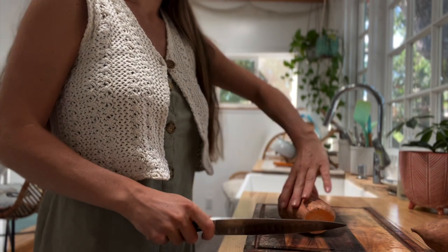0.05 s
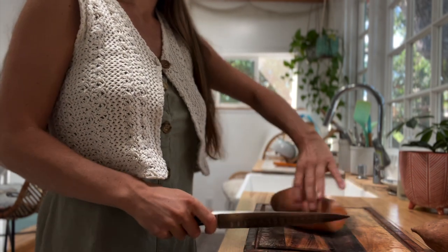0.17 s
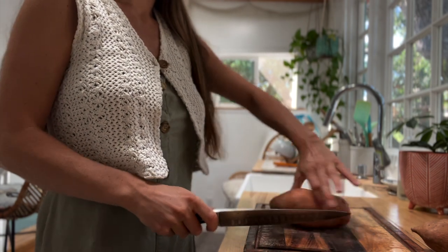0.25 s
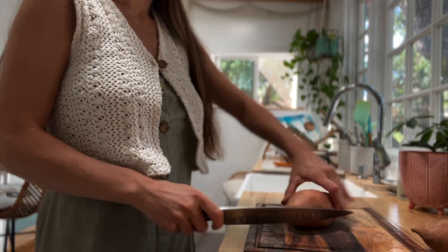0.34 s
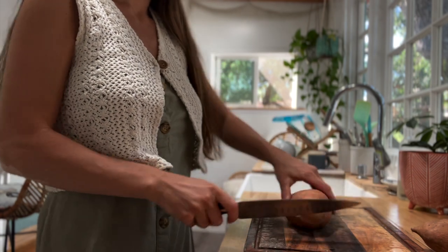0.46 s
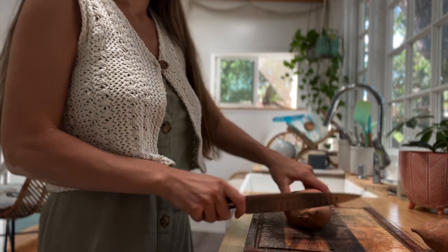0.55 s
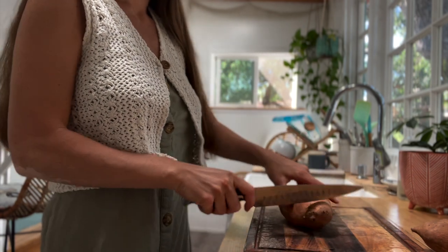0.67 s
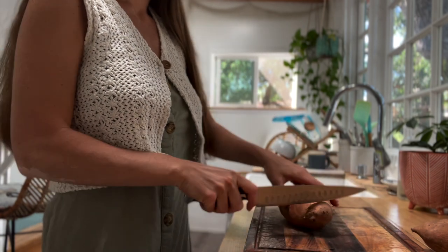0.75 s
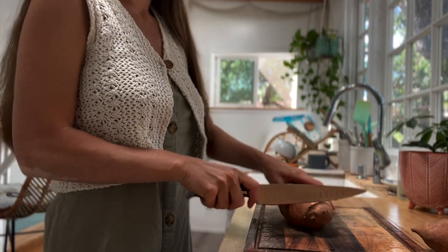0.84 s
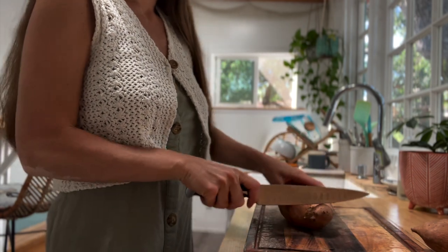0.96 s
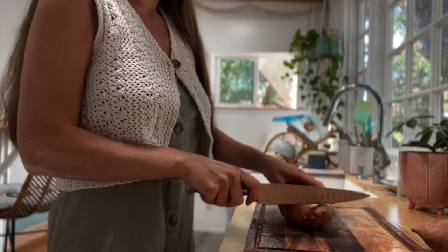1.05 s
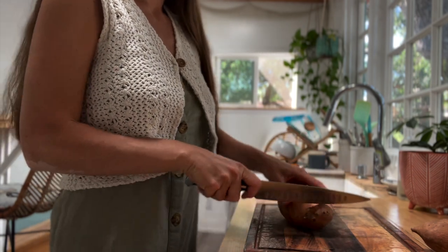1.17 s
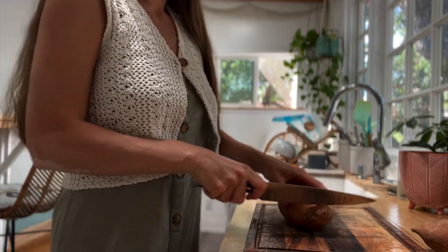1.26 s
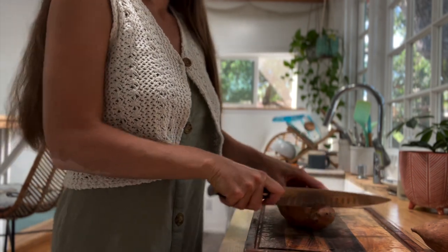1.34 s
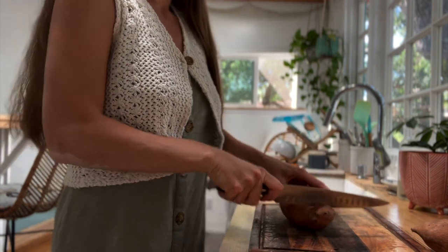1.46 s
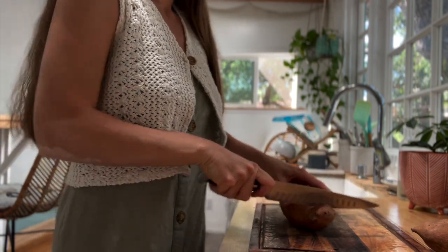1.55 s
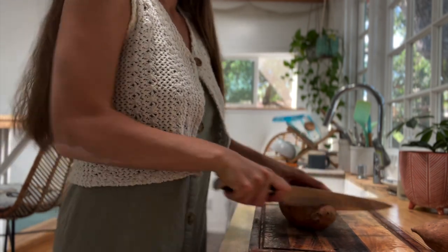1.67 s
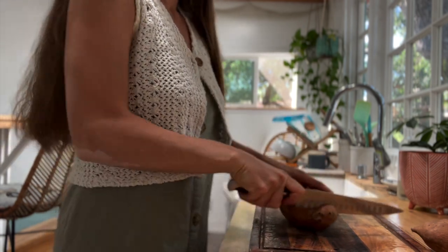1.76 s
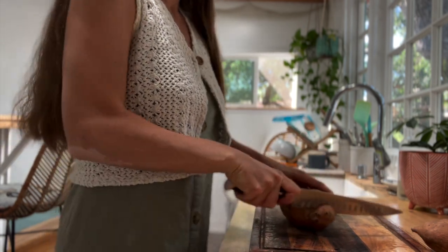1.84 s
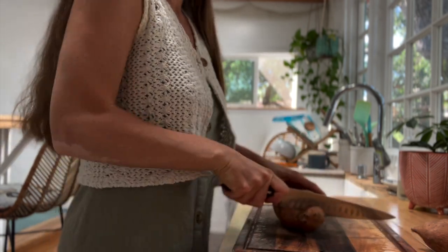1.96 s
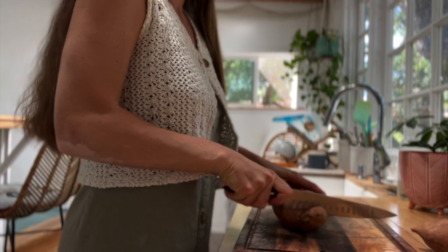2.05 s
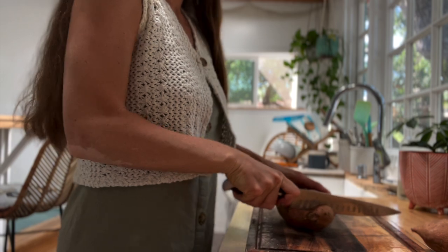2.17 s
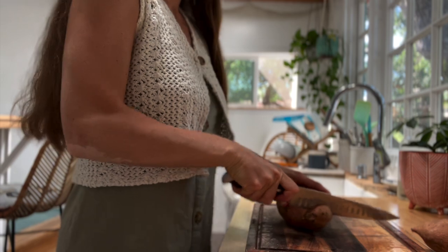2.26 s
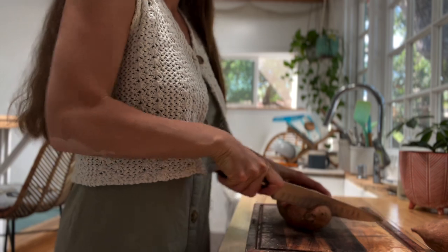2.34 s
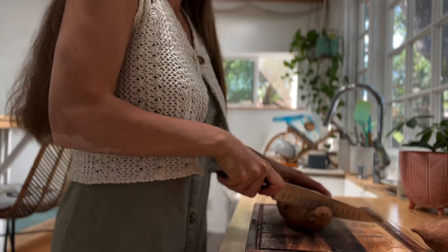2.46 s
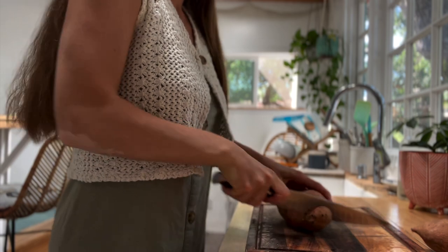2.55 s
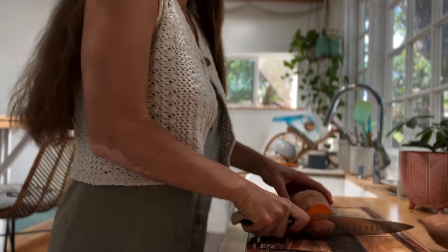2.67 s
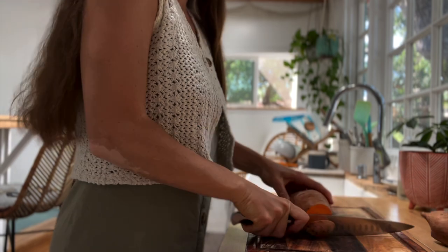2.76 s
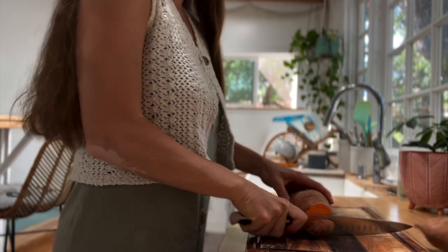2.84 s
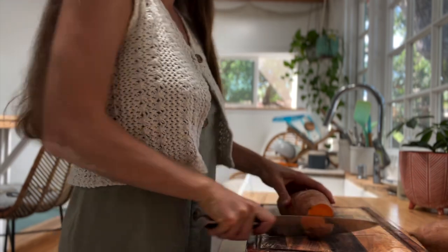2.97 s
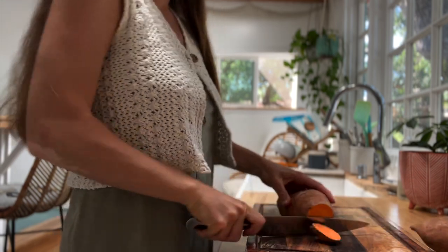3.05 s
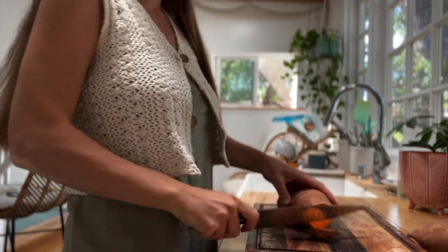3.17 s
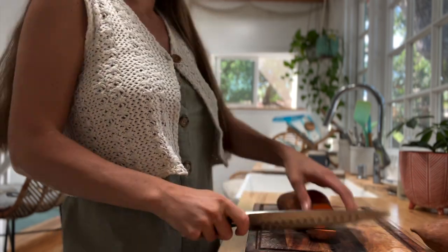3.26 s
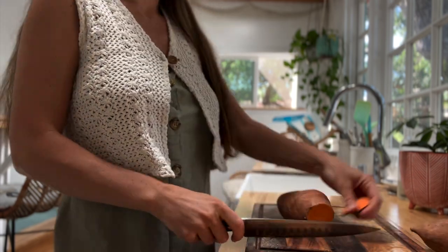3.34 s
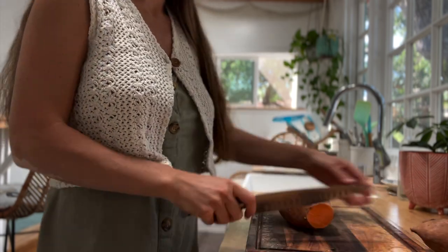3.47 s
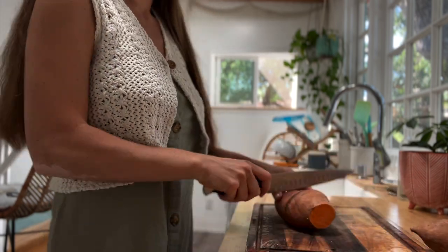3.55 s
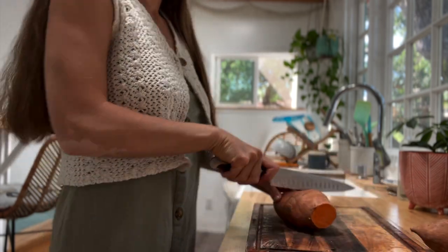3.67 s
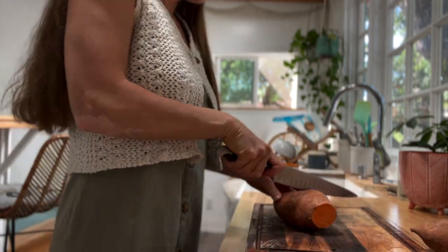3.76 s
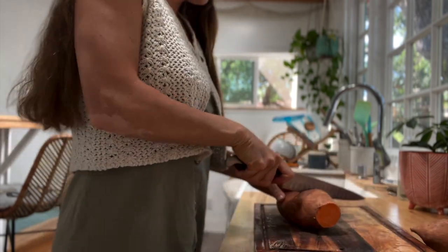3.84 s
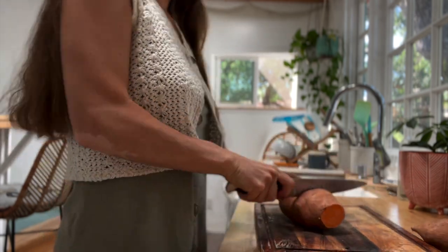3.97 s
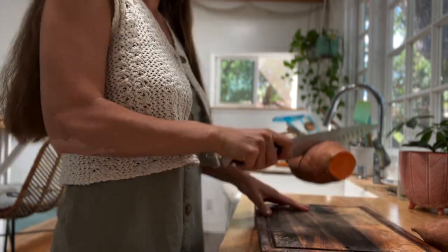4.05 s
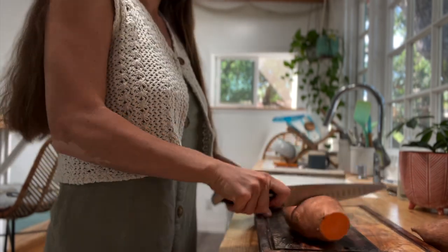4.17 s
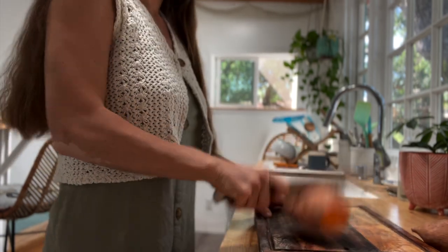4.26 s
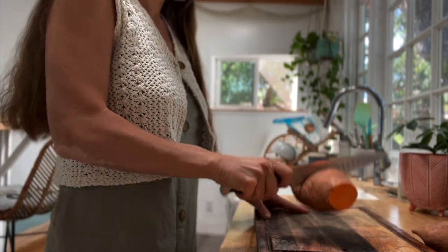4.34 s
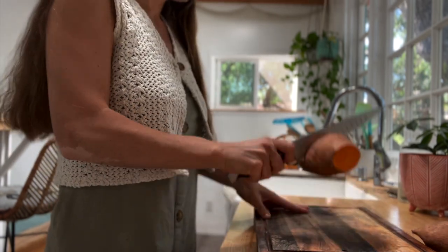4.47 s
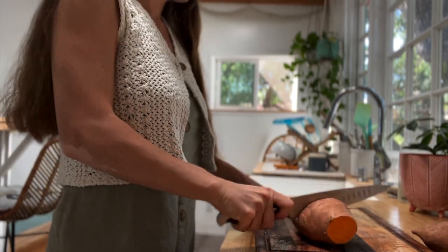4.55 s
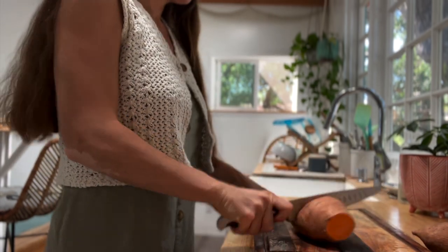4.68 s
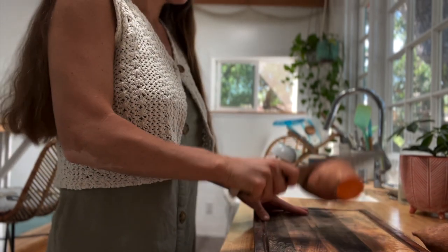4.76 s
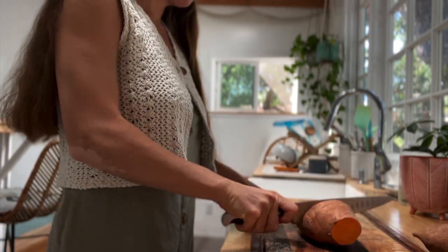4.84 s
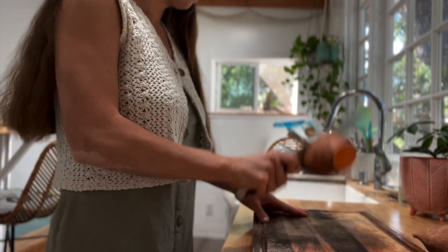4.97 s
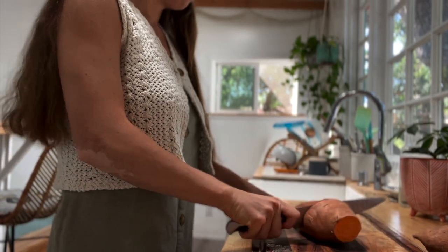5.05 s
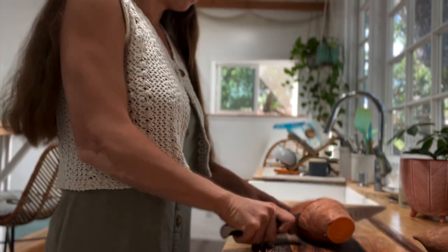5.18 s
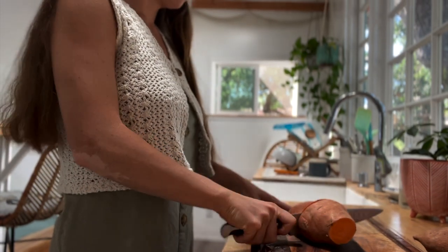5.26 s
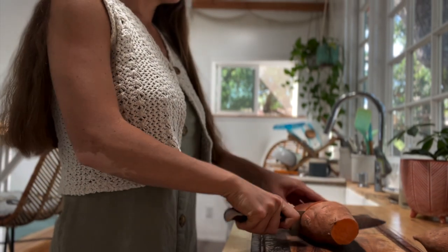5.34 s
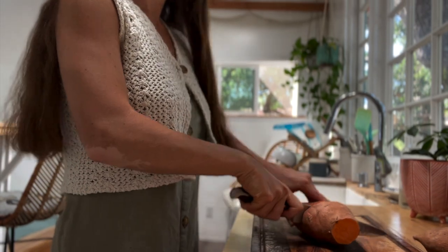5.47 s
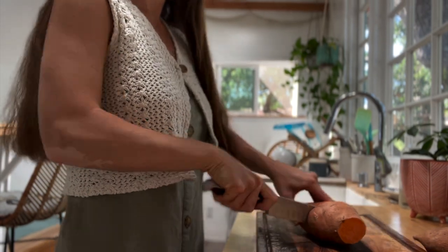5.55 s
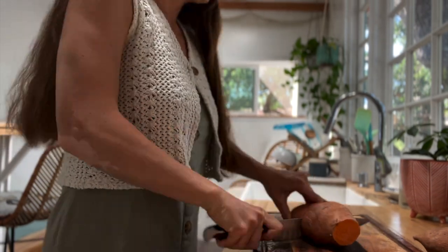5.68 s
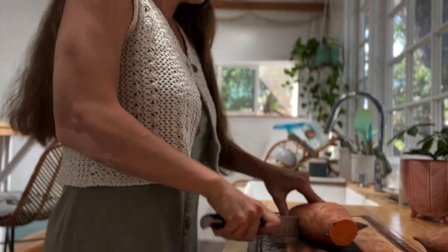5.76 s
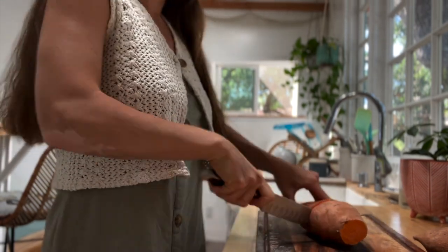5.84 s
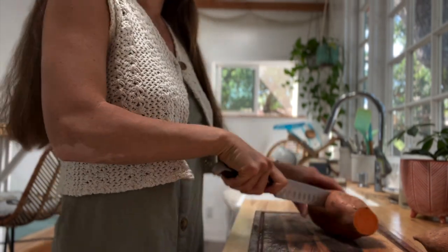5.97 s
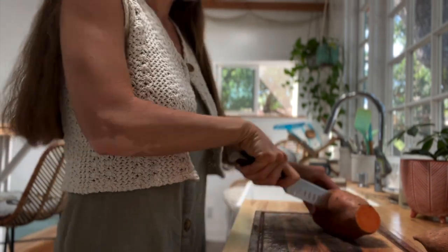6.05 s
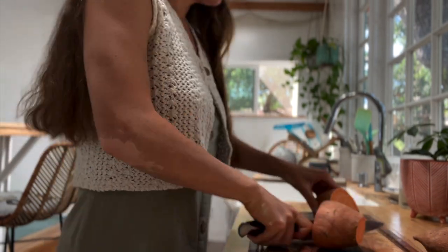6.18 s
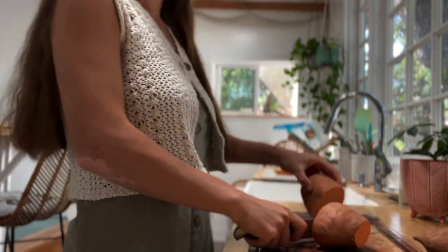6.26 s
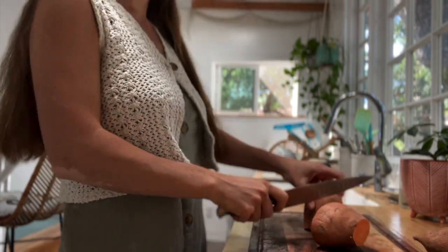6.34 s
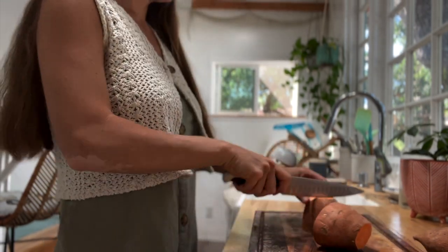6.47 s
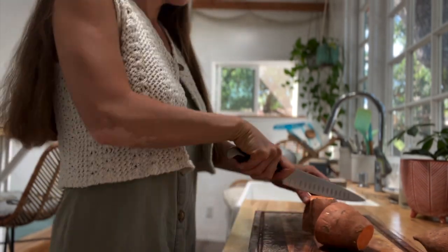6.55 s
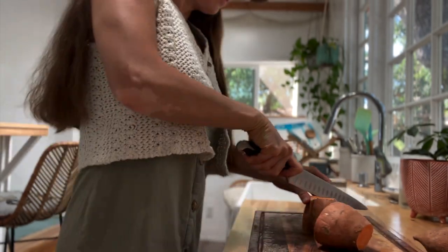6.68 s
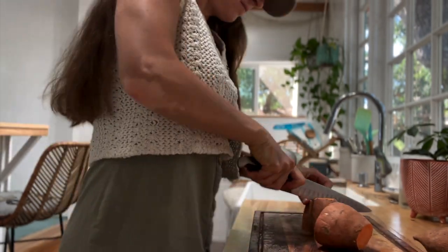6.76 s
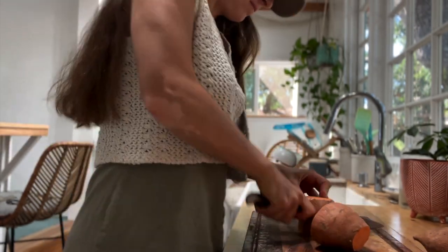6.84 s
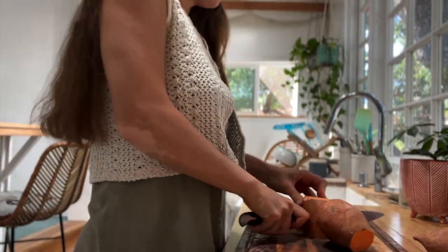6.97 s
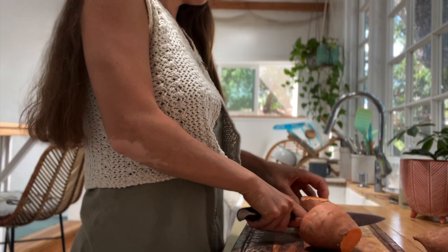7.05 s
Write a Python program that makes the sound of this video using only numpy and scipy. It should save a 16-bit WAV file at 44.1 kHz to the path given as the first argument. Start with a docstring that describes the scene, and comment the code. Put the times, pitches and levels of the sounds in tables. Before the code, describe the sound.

A kitchen knife saws through raw sweet potato with wet rasps and snaps, knocking irregularly on a wooden board.

```python
"""In a small kitchen, a knife saws into a raw sweet potato on a wooden board.
Wet flesh hisses as it tears, the blade rasps and snaps on skin and wood, and once the steel sings.
The knife breaks through and knocks the board, and the stuck root is banged down: board and counter
ring low and the room answers. A fridge hums behind it. Now and then the ringing breaks off abruptly."""
import sys
import numpy as np
from scipy import signal
from scipy.fft import rfft, irfft, next_fast_len
from scipy.io import wavfile
from scipy.ndimage import uniform_filter1d, map_coordinates

SR = 44100
rng = np.random.default_rng(int(sys.argv[2]) if len(sys.argv) > 2 else 0)


def wav_record(signal):
    """Record a signal, one row per channel, as 16-bit PCM in the file named by sys.argv[1]."""
    frames = np.transpose(np.atleast_2d(signal))
    bounded = np.clip(frames, -1, 1)
    # unit amplitude maps onto the largest positive 16-bit level
    quanta = np.round(bounded * 32767).astype(np.int16)
    wavfile.write(sys.argv[1], SR, quanta)


N = 313551

# Levels in the tables are relative. A ring time is how long a sound takes to fade by 60 dB.
# How alike the two ears hear a noise. Each row: frequency in Hz, likeness (1 is the same).
EAR_LIKENESS = [(60, 0.97), (300, 0.71), (700, 0.85), (3000, 0.39), (8000, .9)]
# How far the two sides are out of step. Each row: frequency in Hz, phase in radians.
EAR_PHASE = [(100, 0.14), (400, 0.52), (800, 1.5), (3000, 1.54), (12000, 1.7)]
# Moments when the ringing breaks off. Each row: time in seconds, drop in dB.
CUTOFFS = [(3.253, -40), (4.297, -20.5), (4.656, -4), (4.82, -7.5), (5.132, -30), (5.319, -33),
           (5.768, -4.5), (6.245, -15.5), (6.99, -24.5), (7.082, -18)]
# The background over time. Each row: time in seconds, then fridge hum, murmur and air, all in dB.
ROOM_LEVELS = [(0, -69.5, -73, -74.5), (.56, -66, -63.5, -73), (1.05, -68.5, -72.5, -76),
               (1.4, -70, -67, -74), (2.0, -71, -60, -70.5), (2.42, -70.5, -71, -78),
               (2.8, -68, -64, -70.5), (3.24, -64, -64.5, -75.5), (3.265, -85, -74, -81),
               (3.32, -68, -54, -79), (3.45, -69, -50, -72), (3.7, -69, -62, -77), (4.1, -75, -73, -76),
               (4.29, -77, -73, -77.5), (4.42, -75, -59, -59.5), (5.05, -79, -69, -86),
               (5.38, -81.5, -72.5, -79.5), (5.49, -86, -88.5, -87), (5.7, -88, -79.5, -75.5),
               (6.1, -88, -81, -88), (6.26, -79, -40.5, -64.5), (6.39, -80, -70.5, -77),
               (6.52, -76, -57.5, -73), (6.69, -73.5, -67, -67), (6.8, -75.5, -47, -61.5),
               (7.11, -69, -52.5, -63)]
# The low murmur of counter and room. Each row: frequency in Hz, level in dB.
MURMUR_SPECTRUM = [(40, -49), (80, -21), (125, 1), (160, -15.5), (215, 0), (260, -8), (390, -7),
                   (480, -14.5), (540, -8), (700, -32.5), (1500, -93.5)]
# The soft rush of air. Each row: frequency in Hz, level in dB.
AIR_SPECTRUM = [(380, -42), (650, -12.5), (929, -3), (1100, -10), (1630, -15), (4000, -30.5), (5200, -65.5),
                (8800, -120)]
# The tones of lightly brushed steel. Each row: pitch in Hz, level in dB.
STEEL_TONES = [(4129, -88), (4980, -70.5), (6266, -85), (7483, -69.5), (8753, -77), (10164, -98),
               (11709, -84), (13356, -83)]
# The hiss of wet flesh, also used for the room's faint rustle. Each row: frequency in Hz, level in dB.
HISS_SPECTRUM = [(600, -80), (2650, -36), (4500, -4), (5390, 0.5), (8370, -5.5), (10000, 0.5), (11800, -2),
                 (12500, -9.5), (15000, 0), (16000, 4.5)]
# The edge tearing flesh. Each row: peak time, swell and fade in seconds, level in dB.
SLICE_STROKES = [(.226, 0.11, 0.086, -51.5), (.36, .08, 0.54, -74.5), (1.23, .06, 0.11, -52.5),
                 (1.476, 0.045, 0.065, -68.5), (1.658, 0.051, 0.077, -41.5), (1.872, .03, .06, -69),
                 (2.26, 0.024, .08, -58), (2.495, .009, 0.16, -42), (2.535, .022, .08, -22),
                 (2.86, .04, .15, -50), (2.94, 0.1, 0.066, -44), (3.088, 0.011, 0.17, -64.5),
                 (3.188, .01, 0.1, -67), (3.31, 0.061, 0.041, -71), (3.716, .02, 0.1, -52),
                 (3.842, .055, 0.048, -40), (4.002, 0.037, 0.031, -57), (4.272, 0.023, .1, -58),
                 (4.555, .05, 0.082, -52), (4.7, .03, .15, -65.5), (5.065, 0.032, 0.1, -53),
                 (5.3, .021, .04, -42.5), (5.658, .015, .012, -70), (5.745, 0.045, .025, -47.5),
                 (6.09, 0.017, .1, -42), (6.118, 0.029, 0.14, -32), (6.195, .06, 0.06, -36.5),
                 (6.346, .006, 0.035, -56.5), (6.622, .015, 0.13, -67), (6.875, 0.028, 0.15, -36),
                 (6.92, .021, 0.076, -37.5)]
# Blade or root rubbing on skin and wood. Each row: peak time, swell and fade in seconds, level in dB,
# extra dB for the upper resonances.
RUB_STROKES = [(.226, 0.1, 0.085, -67.5, 3), (1.22, 0.026, 0.23, -66, -4), (1.66, 0.058, 0.1, -66, 8),
               (1.909, 0.1, 0.06, -55.5, -8), (2.074, 0.054, 0.094, -64.5, -6), (2.27, .06, 0.093, -74, -4),
               (2.5, 0.013, .3, -52, 6.5), (2.543, .012, 0.09, -18, -6.5), (2.69, 0.055, 0.15, -47, -3),
               (2.856, 0.023, 0.22, -41.5, -11), (2.96, 0.15, 0.053, -40.5, -10.5),
               (3.508, 0.0045, 0.043, -59.5, -8), (3.58, .01, 0.037, -64.5, -2.5),
               (3.716, 0.022, 0.17, -65, 0), (3.841, 0.047, 0.062, -46, -2),
               (4.002, 0.038, 0.044, -64.5, -5), (4.272, 0.036, .08, -36, -16.5),
               (4.33, 0.039, .3, -49, -15), (4.44, 0.16, .15, -48.5, -10.5),
               (4.557, 0.033, 0.073, -22.5, -8.5), (4.685, 0.017, 0.18, -36, -10.5),
               (4.88, 0.034, 0.34, -51.5, -8.5), (4.936, .012, 0.046, -45, -7.5),
               (5.087, 0.039, 0.027, -24.5, -1.5), (5.301, 0.028, 0.096, -29.5, -2.5),
               (5.748, 0.049, 0.043, -63.5, 4), (6.092, 0.013, 0.19, -61.5, 17.5),
               (6.128, 0.011, 0.093, -29.5, -7), (6.346, 0.0053, .03, -74, 1.5),
               (6.74, 0.0053, 0.14, -37, -23.5), (6.884, 0.036, 0.15, -41, -1),
               (6.916, 0.0058, 0.068, -17.5, -7.5), (7.069, 0.019, .022, -46, -33)]
# Where rubbed blade and root resonate. Each row: centre in Hz, width in Hz, level in dB.
RUB_RESONANCES = [(728, 310, -1.5), (980, 140, 0.5), (1496, 200, -7), (1813, 190, 3), (2133, 330, -1.5),
                  (2928, 640, 1.5), (3570, 280, 2), (3950, 630, -2.5), (5020, 1100, -9.5),
                  (6204, 2100, -16)]
# The edge snapping on skin or wood. Each row: start in seconds, level in dB, rough centre in Hz,
# ring time in seconds.
EDGE_SNAPS = [(2.494, -46, 1980, 0.027), (2.541, -1.5, 2030, 0.022), (2.564, -21.5, 2334, 0.03),
              (3.39, -59, 689, 0.037), (3.511, -30, 588, 0.022), (3.585, -38, 598, 0.021),
              (4.239, -22.5, 1200, 0.082), (4.271, -17, 880, 0.054), (4.513, -37.5, 953, 0.034),
              (4.553, -18.5, 960, 0.068), (4.935, -30, 1320, 0.051), (5.037, -28, 687, 0.037),
              (5.068, -18, 1020, 0.048), (5.269, -29, 947, 0.021), (5.666, -51.5, 600, 0.022),
              (5.714, -42.5, 930, 0.03), (6.125, -17, 607, 0.038), (6.343, -49, 3740, 0.025),
              (6.742, -19.5, 613, 0.02), (6.875, -18, 925, 0.04), (6.914, -5, 2220, 0.031),
              (7.069, -31, 610, 0.042)]
# The tones of the counter (first row) and the board. Each row: pitch in Hz, level in dB,
# ring time in seconds for an average blow.
WOOD_TONES = [(117.5, 9, 0.23), (210.3, -7.5, 0.32), (246.6, -3.5, 0.32), (276.2, -2.5, 0.22),
              (315.7, -2, 0.19), (392.6, -3, 0.26), (450.9, -7, 0.25), (560, 6, 0.13), (726, -1.5, 0.11),
              (884, -3.5, 0.14), (983.5, -5, 0.12), (1174, -14, 0.031)]
# The rattle of a hard contact. Each row: frequency in Hz, level in dB.
RATTLE_SPECTRUM = [(150, -70), (590, -22), (1000, -0.5), (1140, -10), (1510, -3), (2060, -6.5), (2370, -2),
                   (2580, -9), (3210, -9), (4910, -24), (6160, -29.5), (8000, -38.5), (10400, -69),
                   (17600, -120)]
# The kitchen's answer to a rattle. Each row: frequency in Hz, ring time in seconds for an average blow.
KITCHEN_ECHO = [(600, 0.9), (2000, 0.3), (5000, 0.29), (12000, 0.19)]
# Blows on the board. Each row: start in seconds, level in dB, extra dB for the upper tones, for the
# rattle and for the counter's thump, ring length in seconds (compared with AVERAGE_RING_S).
BLOWS = [(.242, -57.5, -15, -9, 3, 0.19), (.366, -32.5, -14, -28, -5, 0.17),
         (0.669, -44, -14, -42, 12, 0.094), (1.201, -55, -30, -25, -9, 0.32),
         (1.25, -46, -29, -22, -14, 0.21), (1.393, -47.5, -28, -28, -7, 0.13),
         (1.637, -33, -40, -15, -10, 0.18), (1.696, -43, -31, -36, 1, 0.15),
         (1.859, -43.5, -7.5, -25.5, -35, 0.3), (1.897, -37.5, -6.5, -15, -32, 0.18),
         (1.963, -44, -29, -41, -7, 0.21), (2.503, -31.5, -17, -18, -18.5, 0.087),
         (2.519, -26, -26, -1.5, -26, 0.22), (2.543, -5, -10.5, -8.5, -35, .16),
         (2.561, -20, -16.5, -4.5, -17, 0.28), (2.579, -19, -6, -4.5, -30.5, .25),
         (2.625, -24, -11, -2.5, 0.5, 0.23), (2.851, -51.5, 5, -4, 4, .15),
         (2.986, -28, -10, -36, -6.5, .14), (3.14, -34, -20, -31, -4.5, .1),
         (3.225, -40, -16, -21, 2.5, 0.21), (3.297, -37, -26.5, -27, -14, .15),
         (3.338, -39, -24, -34, -9, 0.12), (3.391, -30.5, -12.5, -45, -17, 0.22),
         (3.514, -30.5, -5, -27, -26, 0.26), (3.582, -29, 0.5, -46.5, -13.5, 0.15),
         (3.713, -53, 0, -7, -19.5, 0.13), (3.818, -42.5, -9, -17, -6.5, 0.21),
         (3.854, -38, -6.5, -14, -5.5, 0.11), (3.995, -57.5, -1, -15, -6, .15),
         (4.262, -20.5, -5, 3, -13, .2), (4.284, -24, -1, -24, -9, 0.26),
         (4.344, -43, -10, 1.5, -6.5, 0.62), (4.412, -38, -26, 1, -10, 0.3),
         (4.524, -31, -7, -0.5, -25, 0.67), (4.542, -22.5, -13, 0.5, -19.5, 0.23),
         (4.558, -13.5, -9, -3, -15.5, 0.26), (4.584, -15.5, -9.5, -11.5, -13, 0.18),
         (4.681, -24.5, -5, -3, -11, 0.24), (4.707, -18, -12.5, -7.5, -13, 0.2),
         (4.768, -32.5, -7.5, -1.5, -10.5, 0.24), (5.053, -28, -2.5, 3.5, -12, 0.25),
         (5.068, -17, -8, 7.5, -34.5, 0.082), (5.084, -14.5, -3.5, -3.5, -20, 0.21),
         (5.11, -14.5, -32, -11.5, -29, 0.11), (5.269, -32, -15, -3.5, -13, 0.15),
         (5.297, -24.5, -6, 9, -13, .2), (5.511, -50, -8, -31, -10.5, 0.28),
         (5.632, -39, -5.5, -33, -11, 0.12), (5.666, -39, -3, -32, -14.5, 0.23),
         (5.718, -32.5, -5.5, -24, -6, 0.15), (6.124, -15.5, -2, -11.5, -19.5, 0.3),
         (6.272, -40, -10, -41, 0, 0.22), (6.401, -24, -19.5, -50, -11, 0.3),
         (6.552, -32, -6.5, -43.5, -10, 0.18), (6.712, -40.5, -18, -19, -9.5, 0.22),
         (6.74, -20, -19.5, -20.5, -15, 0.33), (6.873, -17.5, 0.5, -19, -12.5, 0.19),
         (6.916, -9, -8.5, -8, -21, 0.21), (6.96, -23.5, -13, -10, -6, 0.11),
         (7.003, -33, -35, -33, -11.5, 0.28), (7.066, -23.5, -20, -44, -22, 0.26)]

SHAKE_MURMUR_DB, SHAKE_AIR_DB, SHAKE_RISE_S, SHAKE_RING_S = -30, -44.5, .04, 0.53
GRAZE_START_S, GRAZE_RISE_S, GRAZE_HOLD_S, GRAZE_RING_S, GRAZE_DB = 0.803, 0.026, 0.034, 0.14, 4
STROKE_DEPTH_DB = 20  # a stroke climbs this much in its swell and drops this much in its fade
LEAD_SWELLS, TOUCH_S = 1.9, .006  # the edge touches this many swells before the peak, this quickly
CONTACT_S, AVERAGE_RING_S = 0.0027, 0.24  # how a blow rises and how long it lasts
PAN_DB, PAN_PER_DB = -1.14, 0.0814  # left over right for a 0 dB blow; softer blows sit further right
TOP_HZ = 15850


def amp(db):
    """Turn decibels into a gain."""
    return 10 ** (np.asarray(db) / 20)


def unit(x):
    """Scale a signal to an average power of 1."""
    return x / np.sqrt(np.mean(x ** 2) + 1e-20)


def along(points, hz):
    """Read a table of frequencies and values at hz, on a log frequency axis."""
    f, v = np.transpose(points)
    return np.interp(np.log(hz + 1), np.log(f + 1), v)


def wobble(rate):
    """A smooth random curve through `rate` new values a second."""
    return map_coordinates(rng.standard_normal(int(N * rate / SR) + 4), [np.arange(N) * rate / SR])


def noise(size, gain_db, window=256, patchy_db=0):
    """Stereo noise shaped by gain_db(frequency, time), with optional louder and softer patches."""
    hz, t, spectra = signal.stft(rng.standard_normal((3, size)), SR, nperseg=window)
    patches = uniform_filter1d(spectra[2].real, size=2, axis=0)
    patches = unit(uniform_filter1d(patches, size=2560 // window, axis=1))
    spread = np.arccos(along(EAR_LIKENESS, hz))[:, None] / 2
    mid, side = spectra[0] * np.cos(spread), spectra[1] * np.sin(spread)
    pair = np.array([mid + side, (mid - side) * np.exp(1j * along(EAR_PHASE, hz))[:, None]])
    shaped = pair * amp(gain_db(hz[:, None], t) + patchy_db * patches)
    return signal.istft(shaped, SR, nperseg=window)[1][:, :size]


def cutoff(start, t):
    """Gain of a sound t seconds after its start: it drops within 2 ms at the next cutoff."""
    at, drop_db = next(((at, db) for at, db in CUTOFFS if at > start), (N / SR, 0))
    return amp(drop_db * np.clip((start + t - at + 0.0023) / 0.002, 0, 1))


def stroke_gains(strokes, roundness):
    """One gain curve a stroke: it swells, then fades (roundness 1 is pointed, 2 is rounded)."""
    gains = []
    for peak, swell, fade, db, *_ in strokes:
        t = np.arange(N) / SR - peak
        distance = np.where(t < 0, -t / swell, np.abs(t / fade) ** roundness)
        touch = np.clip((t + LEAD_SWELLS * swell) / TOUCH_S, 0, 1)
        gains.append(amp(db - STROKE_DEPTH_DB * distance) * touch * cutoff(peak, t))
    return np.array(gains)


def fridge(level_db):
    """The mains hum wavers, and the compressor shakes the floor with a deep drone."""
    hum = np.sin(2 * np.pi * 120.5 * np.arange(N) / SR + .5 * wobble(12))
    drone = unit(noise(N, lambda f, _: -30 * np.log2((f + 1) / 52) ** 2, window=2048))
    return amp(level_db + 1.7 * wobble(7)) * hum + amp(level_db - 5.5) * drone


def counter_shake():
    """How strongly all the blows so far still shake the counter, as a gain."""
    power, t = np.zeros(N + SR), np.arange(SR) / SR
    rise = 1 - np.exp(-t / SHAKE_RISE_S)
    for start, db, *_ in BLOWS:
        shake = amp(db - 60 * t / SHAKE_RING_S) * rise * cutoff(start, t)
        power[round(start * SR):][:SR] += shake ** 2
    return np.sqrt(power[:N])


def kitchen():
    """The fridge, a restless low murmur, and air with a faint rustle; blows stir murmur and air."""
    times, *levels = np.transpose(ROOM_LEVELS)
    hum_db, murmur_db, air_db = [np.interp(np.arange(N) / SR, times, db, -150, -150) for db in levels]
    shake = counter_shake()
    murmur = unit(noise(N, lambda f, _: along(MURMUR_SPECTRUM, f), window=2048))
    air = unit(noise(N, lambda f, _: along(AIR_SPECTRUM, f), patchy_db=3.5))
    rustle = unit(noise(N, lambda f, _: along(HISS_SPECTRUM, f), patchy_db=3))
    rustle *= amp(-12.5 + 0.71 * wobble(60))
    murmur_gain = np.hypot(amp(murmur_db), amp(SHAKE_MURMUR_DB) * shake) * amp(2.5 * wobble(18))
    air_gain = np.hypot(amp(air_db), amp(SHAKE_AIR_DB) * shake)
    lean_right = amp([[-1.5], [1.5]])
    return lean_right * (murmur_gain * murmur + fridge(hum_db)) + air_gain * (air + rustle)


def singing_blade():
    """One graze sets the steel's tones singing, each unsteady in level and pitch."""
    t = np.arange(N) / SR
    ring = sum(amp(db + 5.5 * wobble(54.8)) * np.sin(2 * np.pi * hz * t + 0.74 * wobble(89))
               for hz, db in STEEL_TONES)
    rise = np.clip((t - GRAZE_START_S) / GRAZE_RISE_S, 0, 1)
    fading_s = np.maximum(t - GRAZE_START_S - GRAZE_RISE_S - GRAZE_HOLD_S, 0)
    lean_left = amp([[1.5], [-1.5]])
    return lean_left * rise * amp(GRAZE_DB - 60 * fading_s / GRAZE_RING_S) * ring


def tearing_flesh():
    """Wet cells tear along the edge as fine grains of hiss."""
    grains = amp(1.2 * wobble(400) + 2.7 * wobble(50))
    hiss = unit(grains * noise(N, lambda f, _: along(HISS_SPECTRUM, f), patchy_db=4.5))
    return stroke_gains(SLICE_STROKES, roundness=1.2).max(axis=0) * hiss


def rasp(resonances, scratching):
    """Scratchy noise, strongest where blade and root resonate."""
    def spectrum_db(f, _):
        power = sum(amp(2 * db) / (1 + (2 * (f - hz) / width) ** 2) ** 2 for hz, width, db in resonances)
        return 10 * np.log10(power)
    return unit(scratching * noise(N, spectrum_db, window=512, patchy_db=3))


def rubbing():
    """Rubbing on skin and wood makes a low and a high rasp, mixed differently for each stroke."""
    low_gains = stroke_gains(RUB_STROKES, roundness=1.15)
    high_gains = low_gains * amp([row[-1:] for row in RUB_STROKES])
    scratching = amp(2.2 * wobble(250) + 1.2 * wobble(40))
    low = rasp(RUB_RESONANCES[:5], scratching)
    high = rasp(RUB_RESONANCES[5:], scratching)
    return low_gains.max(axis=0) * low + high_gains.max(axis=0) * high


def edge_snaps():
    """The steel edge snaps on skin or wood: a short burst of noise with a sharp start."""
    out, t = np.zeros((2, N + SR)), np.arange(SR // 10) / SR
    rise = 1 - np.exp(-t / 0.0016)
    for start, db, hz, ring_s in EDGE_SNAPS:
        burst = unit(noise(len(t), lambda f, _: -7 * np.log2((f + 50) / hz) ** 2))
        out[:, round(start * SR):][:, :len(t)] += amp(db - 2.5 - 60 * t / ring_s) * rise * burst
    return out[:, :N]


def wood_ring(t, upper_db, thump_db, stretch, pan_db):
    """Counter and board ring in fading tones, a little different at every blow."""
    hz, level_db, ring_s = np.transpose(WOOD_TONES)[:, :, None]
    level_luck, pitch_luck, phase_luck, pair_luck = rng.standard_normal((4, len(hz), 1))
    drift = hz / 24000 * np.cumsum(rng.standard_normal((len(hz), len(t))), axis=1)
    blur = uniform_filter1d(drift, size=90)  # the loose board never rings purely
    start_db = level_db + 2 * level_luck + (hz < 160) * thump_db + (hz > 500) * upper_db
    strength = amp(start_db - 60 * t / (stretch * ring_s))
    phase = 2 * np.pi * hz * (1 + .02 * pitch_luck) * t + 2 * phase_luck + blur
    skew = 0.0016 * hz * pair_luck  # higher tones reach the two ears less alike
    beat_hz = 23 * (1 + 0.44 * pair_luck)  # close pairs of tones beat
    flutter = 1 + .5 * np.sin(2 * np.pi * beat_hz * t + 3 * pitch_luck)
    return np.array([amp(-ear * pan_db / 2) * (strength * flutter * np.sin(phase + ear * skew)).sum(0)
                     for ear in (-1, 1)])


def contact_rattle(size, stretch):
    """Hard contact makes a rattle that the kitchen's echo draws out."""
    def spectrum_db(f, t):
        return along(RATTLE_SPECTRUM, f) - 60 * t / (stretch * along(KITCHEN_ECHO, f))
    rattle = noise(size, spectrum_db, patchy_db=4)
    return rattle / np.sqrt(np.mean(rattle[:, :SR // 50] ** 2))  # the first 20 ms set the level


def board_knocks():
    """Knife or root strikes the board: each blow rings the wood and adds a rattle."""
    out, t = np.zeros((2, N + SR)), np.arange(SR // 2) / SR
    rise = (1 - np.exp(-t / CONTACT_S)) ** 2
    bass_cut = signal.butter(4, 75, 'high', fs=SR, output='sos')  # a small board gives no deep bass
    for start, db, upper_db, rattle_db, thump_db, ring_s in BLOWS:
        stretch = ring_s / AVERAGE_RING_S
        wood = wood_ring(t, upper_db, thump_db, stretch, pan_db=PAN_DB + PAN_PER_DB * db)
        wood = amp(db - 5.5) * signal.sosfilt(bass_cut, rise * wood)
        rattle = amp(db + rattle_db - 10) * rise * contact_rattle(len(t), stretch)
        out[:, round(start * SR):][:, :len(t)] += (wood + rattle) * cutoff(start, t)
    return out[:, :N]


def scene():
    """Add the cutting and the kitchen together."""
    return board_knocks() + edge_snaps() + rubbing() + tearing_flesh() + singing_blade() + kitchen()


def record(dry):
    """A small microphone rounds the highest peaks and loses the deep bass and the very top treble."""
    size = next_fast_len(N + SR // 4)
    hz = np.fft.rfftfreq(size, 1 / SR)
    bass_cut = (1j * hz / (28 + 1j * hz)) ** 2
    treble_cut = (1 - np.tanh((hz - TOP_HZ) / 40)) / 2
    rounded = dry / (1 + np.abs(dry / .95) ** 4) ** .25
    return irfft(rfft(rounded, size) * bass_cut * treble_cut, size)[:, :N]


dry = scene()
out = record(dry)
wav_record(out)
```